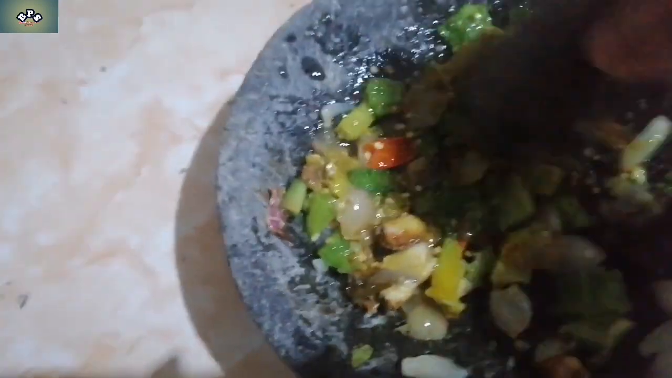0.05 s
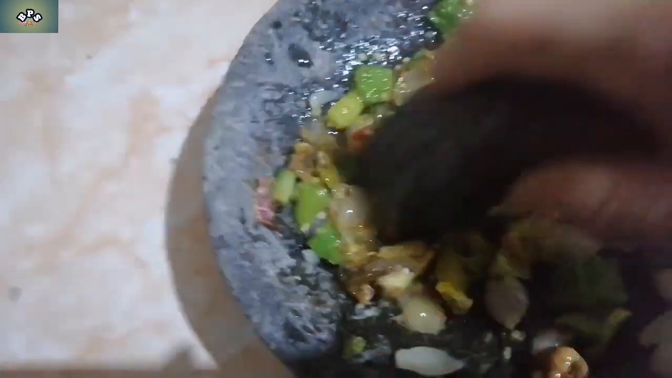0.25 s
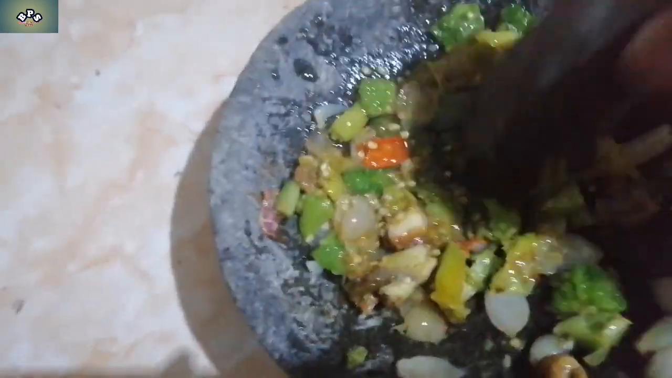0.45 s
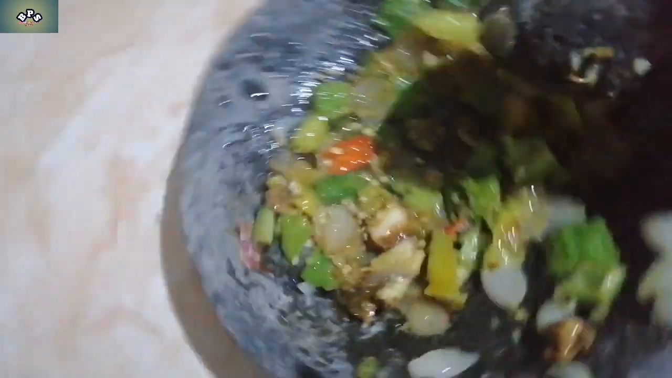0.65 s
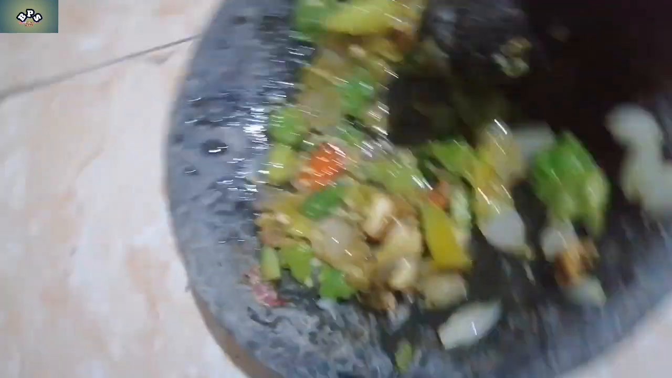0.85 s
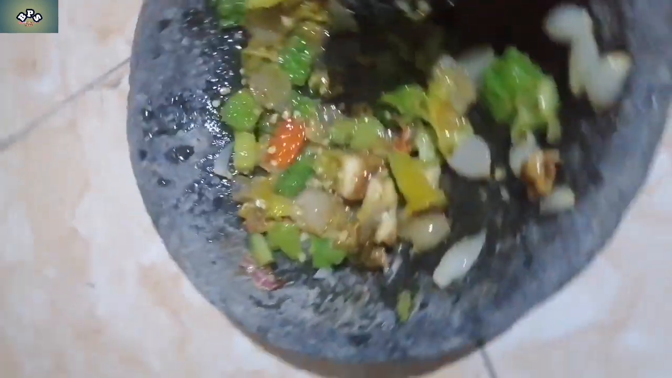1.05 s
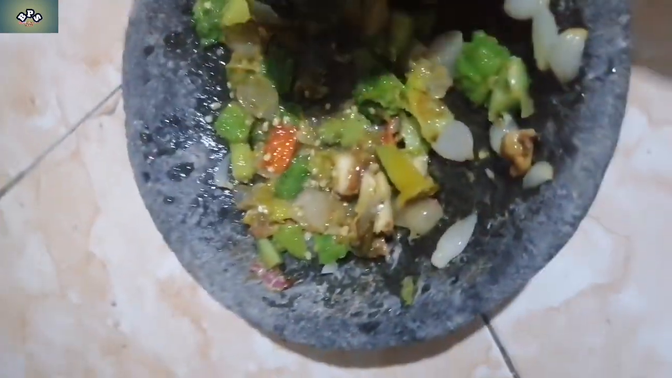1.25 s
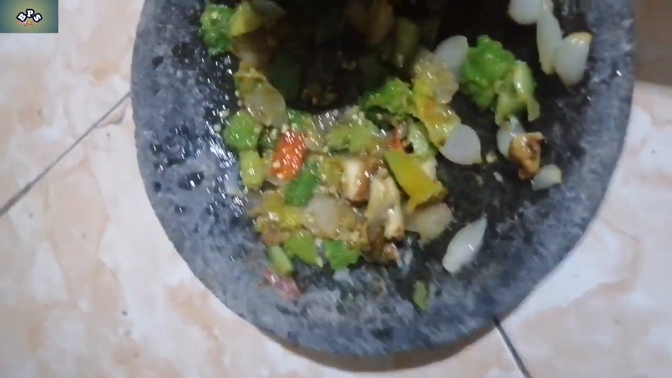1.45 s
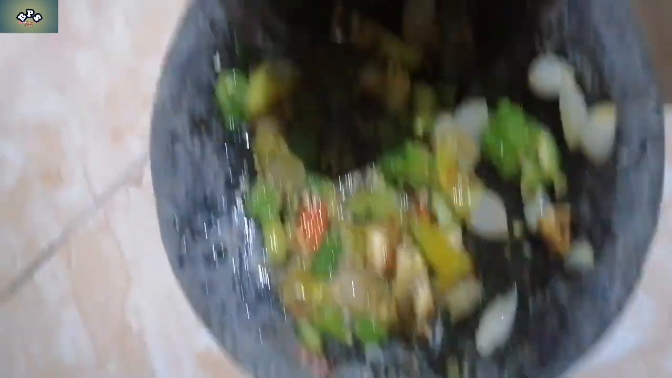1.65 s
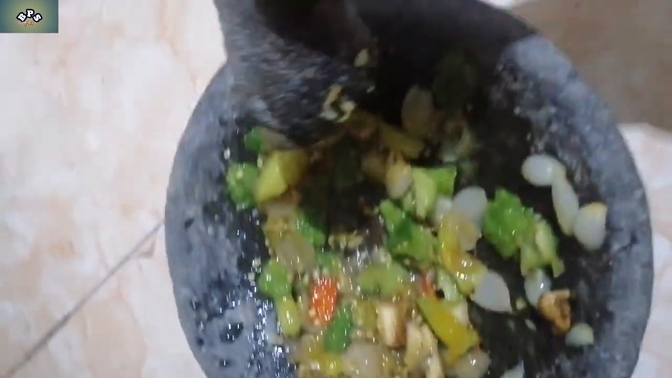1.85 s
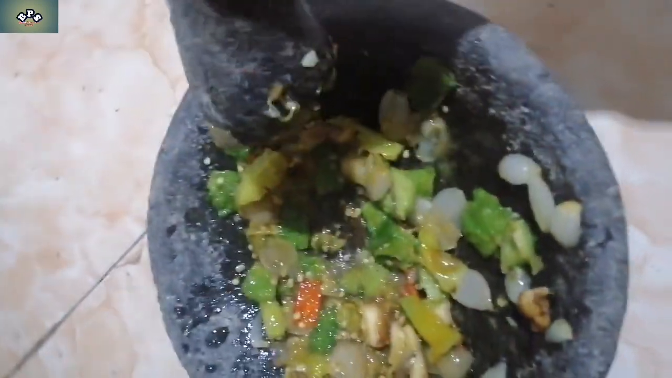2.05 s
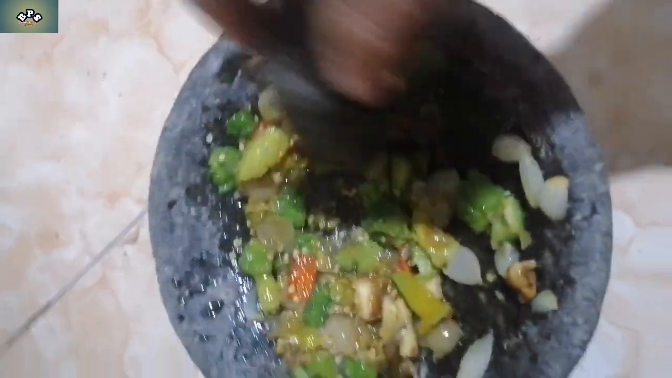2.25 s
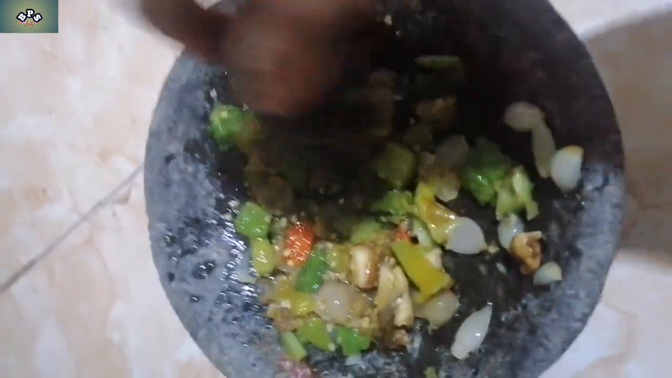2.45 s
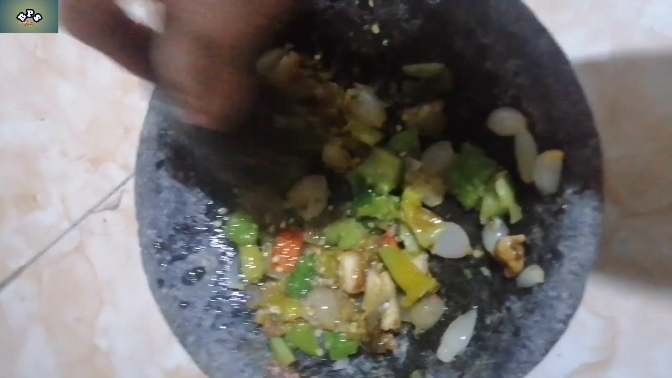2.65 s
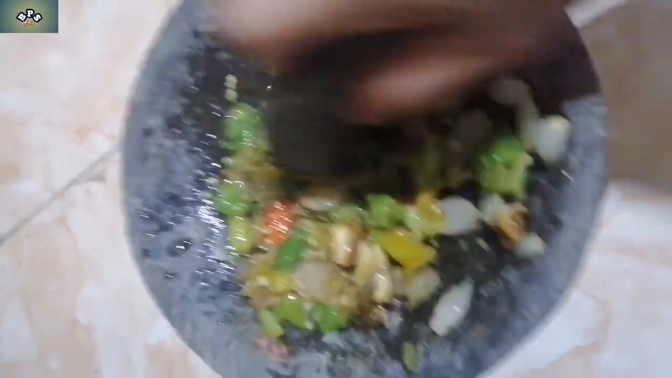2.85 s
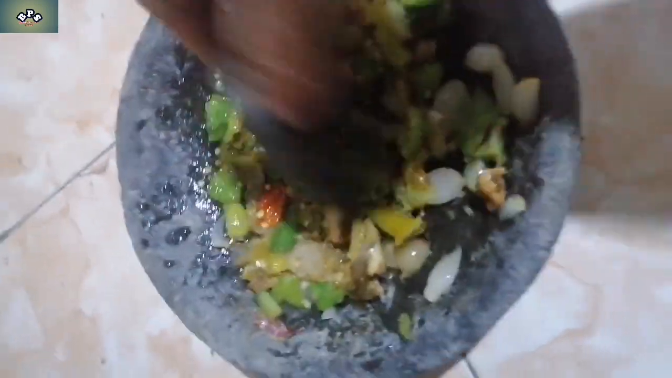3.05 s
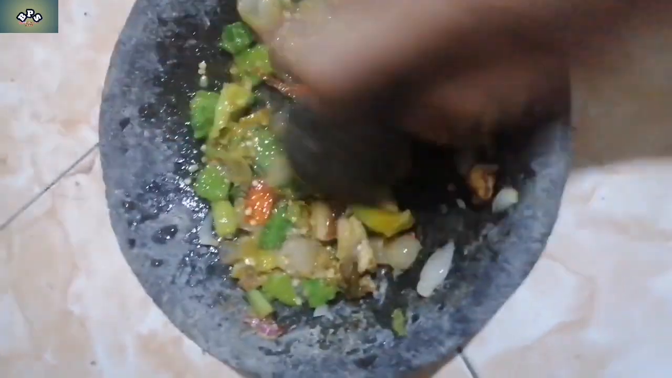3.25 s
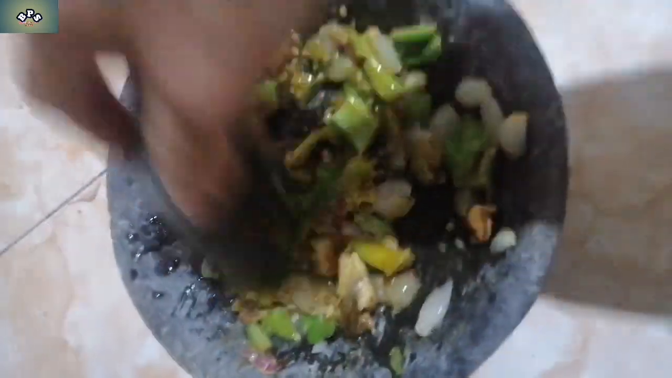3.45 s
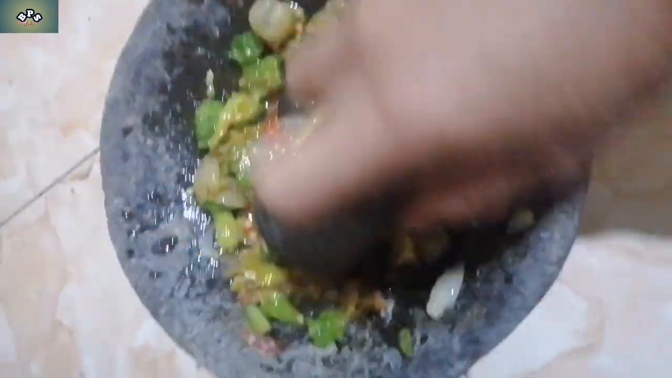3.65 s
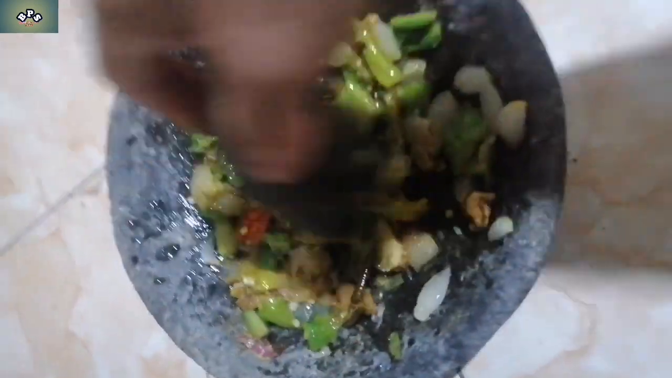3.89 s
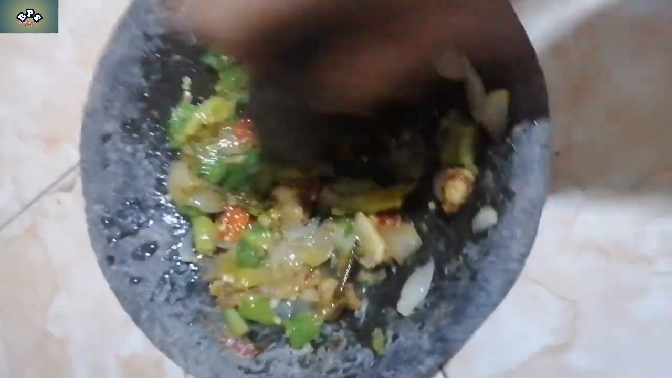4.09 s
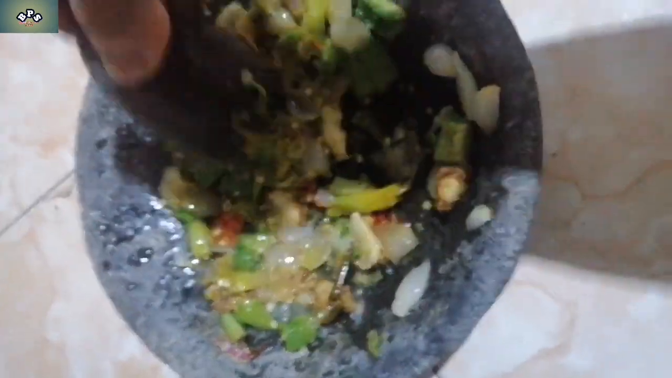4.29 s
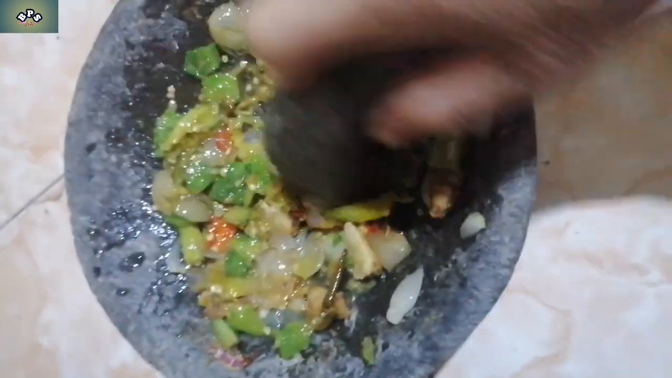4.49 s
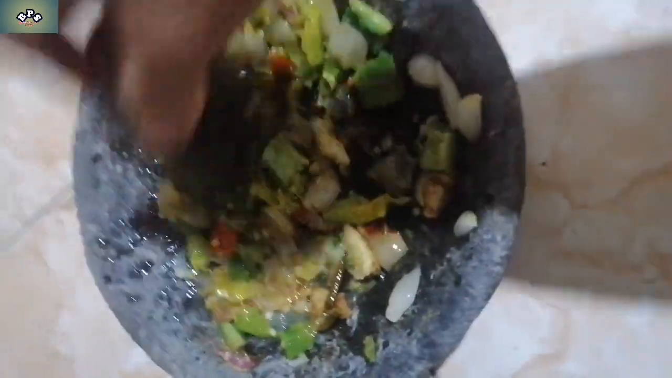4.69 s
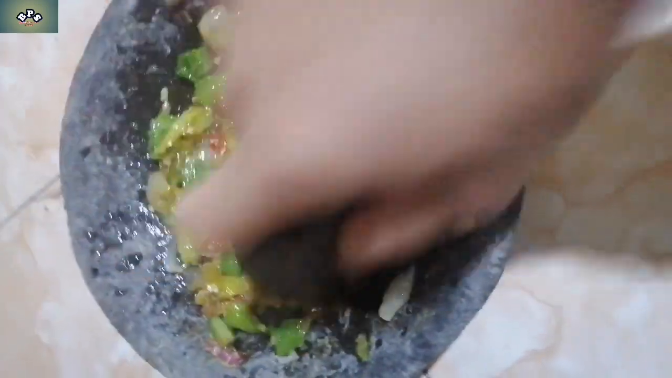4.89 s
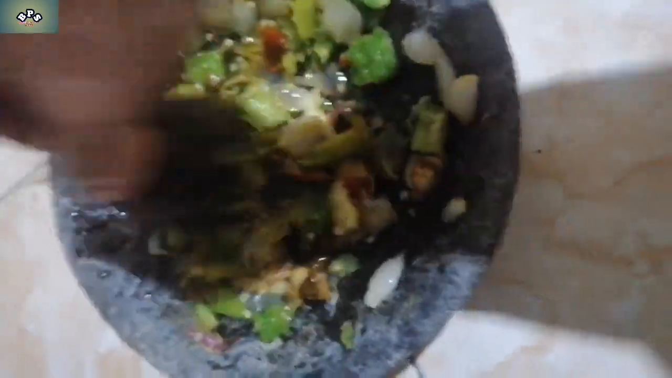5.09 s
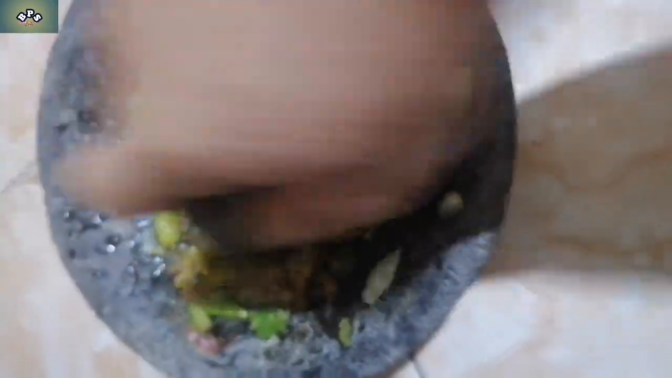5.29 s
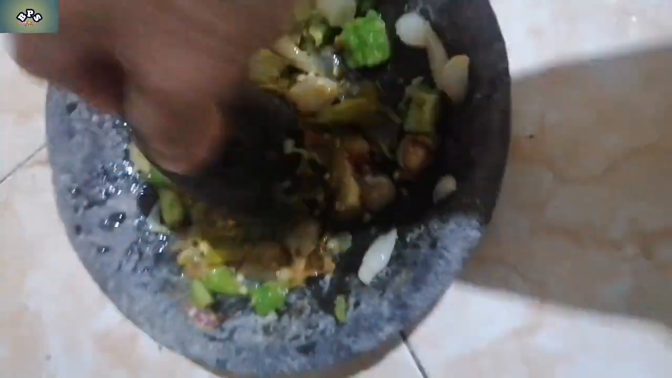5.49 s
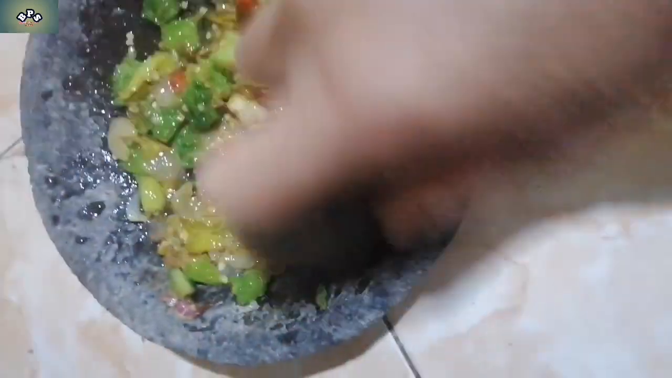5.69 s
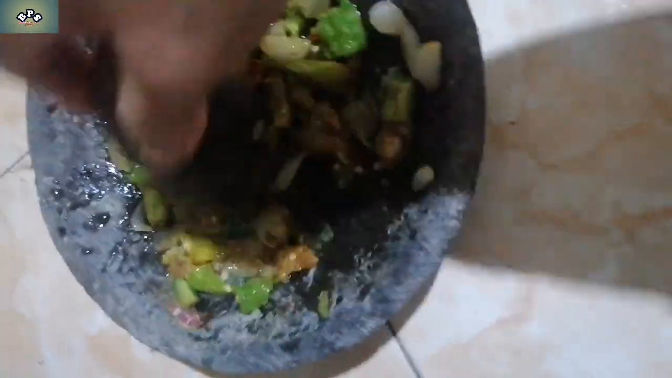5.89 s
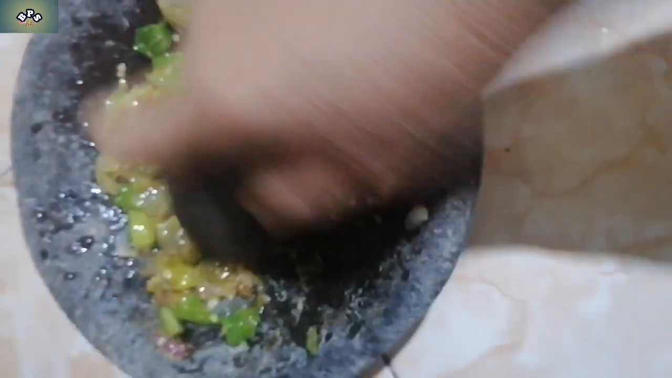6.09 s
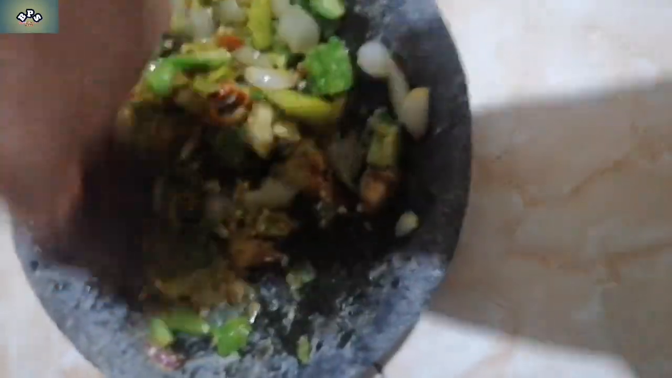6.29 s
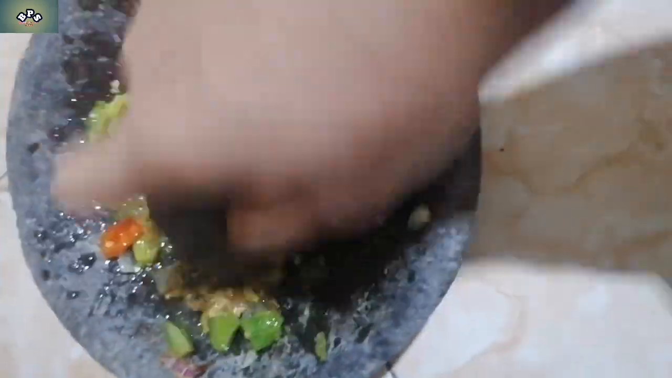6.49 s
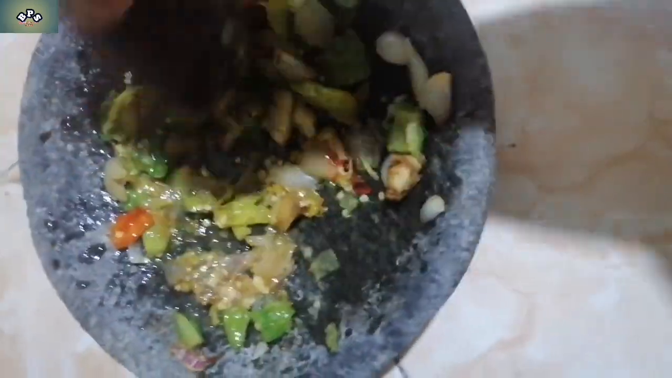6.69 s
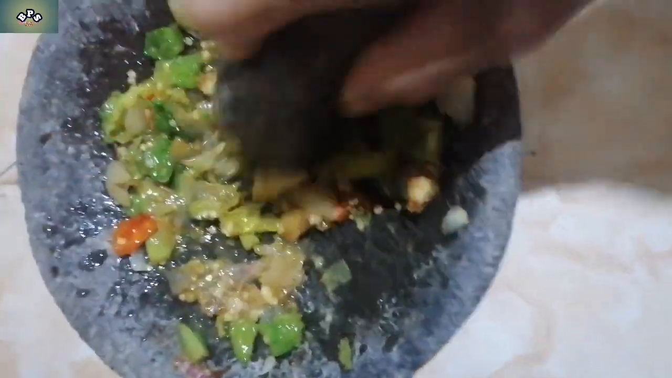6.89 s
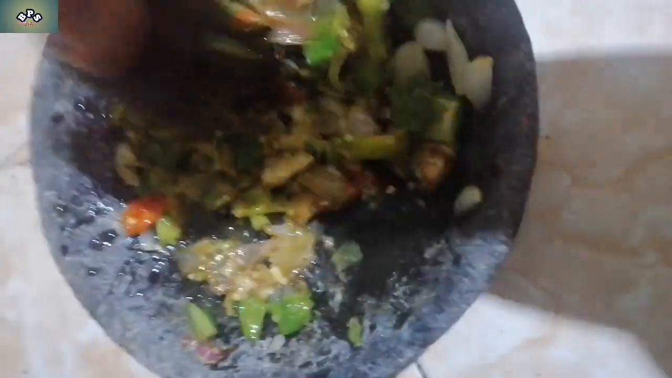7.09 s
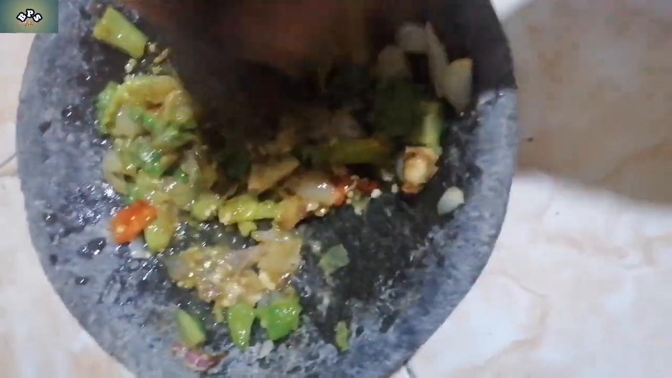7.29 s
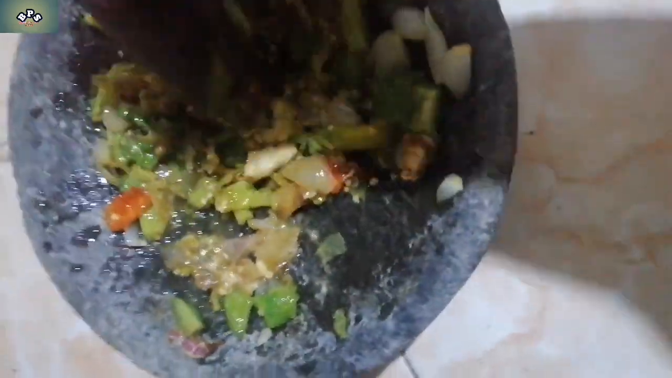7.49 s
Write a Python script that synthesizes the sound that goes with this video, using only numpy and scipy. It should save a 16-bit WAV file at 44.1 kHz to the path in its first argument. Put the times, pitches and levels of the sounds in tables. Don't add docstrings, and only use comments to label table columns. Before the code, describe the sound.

Dull, woody-sounding stone knocks thump the floor and faintly ring the bowl, each mixed with a bright wet fizz and crisp vegetable pops. After a couple of early hits there is a near-silent gap, then the pounding becomes busy and uneven, strongest past the middle, with one clear stone clink. Close stereo pickup, leaning somewhat left, in a reverberant kitchen with faint hum and hiss.

```python
import sys
import numpy as np
from scipy import signal
from scipy.fft import rfft, irfft, next_fast_len
from scipy.io import wavfile
from scipy.ndimage import uniform_filter1d

SR = 44100
rng = np.random.default_rng(int(sys.argv[2]) if len(sys.argv) > 2 else 0)


def ratio_of_db(decibels):
    return 10 ** (np.asarray(decibels, float) / 20)


def materialize(psi):
    bounded = np.clip(np.atleast_2d(psi).T, -1, 1)
    quanta = np.round(bounded * 32767).astype(np.int16)
    wavfile.write(sys.argv[1], SR, quanta)


N = 332514

# frequency in Hz, level in dB per Hz.
AIR_SPECTRUM = [(20, -10), (45, -11.5), (65, -15), (215, -12.5), (300, -23), (900, -27.5), (2300, -33),
                (4200, -43.5), (7000, -39), (9600, -33.5), (11000, -42), (12500, -51), (14800, -47.5),
                (16200, -64)]
# frequency in Hz, likeness from -1 to 1.
AIR_LIKENESS = [(60, 0.56), (180, 0.88), (550, 0.47), (1650, -0.6), (4970, 0.32), (15000, -0.25)]
# frequency in Hz, left over right in dB.
AIR_LEAN = [(60, 0.5), (180, 3.6), (550, 0.5), (1650, 1.1), (4970, 0.41), (15000, 5.3)]
# frequency in Hz, width in Hz, level in dB.
HUM_LINES = [(27.1, 5.8, -60), (39.6, 6, -63.5), (97, 6.4, -70), (159, 3.9, -68), (196.6, 20, -70.5),
             (233.3, 19, -70.5), (539.6, 8.6, -75.5), (745, 23, -76.5)]

# delay in ms, level in dB.
ECHOES = [(5.0, -11.5), (8.0, -18.5), (13.5, -13), (15.5, -24.5), (24.0, -41)]
# frequency in Hz, 60 dB decay in seconds.
KITCHEN_DECAY = [(120, 0.87), (330, 0.65), (870, 0.87), (2300, 0.7), (6000, 0.42), (14000, 0.1)]
# frequency in Hz, level in dB.
ROOM_SEND = [(120, -11.5), (250, 7), (600, -5), (1500, -7), (3200, -5.5), (7000, -11), (14000, -19.5)]
# frequency in Hz, width in Hz, level in dB, left over right in dB.
PORT_CAVITIES = [(3200, 555, 6.5, 4.5), (5250, 1460, 0.5, -2.5), (7000, 200, 4.5, -15.5),
                 (10400, 1900, -1, 2), (14800, 3700, -32, 4)]

# time in seconds, left over right of the paste in dB.
PESTLE_PLACE = [(0, -12.5), (.4, -8.5), (2.45, -12.5), (2.95, -7), (3.2, -5), (3.33, -12), (3.7, 1),
                (4.1, -3), (4.55, -3), (4.95, -9), (5.33, -4), (5.8, -7.5), (6.15, -3.5), (6.25, -9),
                (6.5, -5.5), (6.95, -11), (7.25, -3.5), (7.4, -14)]

# frequency in Hz, level in dB per Hz.
FIZZ_SPECTRUM = [(2060, -37), (3500, -18), (4130, -7), (5330, -4.5), (6010, -6.5), (6400, 2), (7040, -3.5),
                 (8150, -3.5), (8970, -10), (10600, -20), (11500, -18), (14800, -19), (16000, -29.5)]
# frequency in Hz, level in dB per Hz.
SQUELCH_SPECTRUM = [(1200, -21), (2000, 7.5), (2700, 5), (3200, 0), (3800, -1), (4600, -24.5)]
# peak time in seconds, level in dB, build-up in seconds,
# squelch against the fizz in dB.
SPURTS = [(0.001, -48.5, 0.0011, 12), (0.317, -45, 0.0012, -0.5), (2.397, -44, 0.00084, 7),
          (2.652, -48, 0.0081, -11), (2.954, -46, 0.042, -2.5), (3.341, -39, 0.022, -28),
          (3.723, -38.5, .04, -9.5), (4.165, -37, 0.053, -8), (4.217, -42.5, 0.043, -5),
          (4.437, -47.5, 0.015, 1), (4.935, -44.5, 0.00061, -3), (4.955, -63.5, 0.0093, -22),
          (5.312, -38, 0.011, -11.5), (5.716, -78, 0.0034, 40), (6.096, -48, 0.00076, -1),
          (6.459, -39.5, 0.014, -4), (6.812, -56, 0.014, -18), (6.866, -46, 0.014, -1),
          (7.371, -37.5, 0.0078, -9)]
# peak time in seconds, level in dB, build-up in seconds,
# fade in dB per second, squelch against the fizz in dB.
SQUEEZES = [(0.083, -60, 0.61, 400, -22), (.372, -45, 0.0067, 280, -0.5), (0.5, -54.5, 0.021, 211, -14),
            (2.412, -49, 0.014, 98, -12), (2.542, -70, 0.081, 241, 1), (2.923, -54.5, 0.35, 195, -6.5),
            (2.977, -51, 0.018, 190, -13), (3.208, -54.5, .001, 98, -10), (3.354, -45.5, 0.1, 192, -8),
            (3.616, -44, 0.0012, 267, -6), (3.75, -54, .03, 91, -9.5), (4.049, -46, .001, 162, -11),
            (4.24, -56, 0.022, 101, -24), (4.544, -45, .2, 124, -7), (4.983, -46.5, 0.0099, 177, -2.5),
            (5.328, -45, 0.0065, 80, -10.5), (5.456, -49, 0.0032, 138, -8), (5.833, -44, 0.19, 129, -9.5),
            (6.17, -35.5, 0.056, 380, -11), (6.235, -56.5, 0.045, 138, -9.5),
            (6.559, -46.5, 0.057, 120, -6.5), (6.917, -51, 0.059, 66, -11.5),
            (7.272, -46.5, 0.037, 162, -9.5), (7.4, -48.5, 0.017, 103, -8.5)]

# start in seconds, peak in dB, pitch in Hz,
# left over right in dB, length in ms.
SPLITS = [(0.055, -42, 5040, -20, 0.34), (2.397, -33.5, 5250, -37, 1.1), (2.794, -44, 6060, -7, 1.7),
          (3.252, -39, 3330, 0.5, 3.8), (3.337, -35.5, 7200, -15, 1.5), (3.6177, -27.5, 4700, 13, 1),
          (3.643, -40, 6860, -4, 1.5), (3.8375, -46.5, 2670, 8, 1.2), (4.121, -40.5, 5300, -1, 0.97),
          (4.4682, -37.5, 6700, -2, 3.1), (4.9355, -36, 2700, 4, 2.2), (5.4108, -54, 7260, -6, 1.5),
          (5.4306, -43.5, 6700, -8, 2.1), (6.0927, -40.5, 8000, -3, 4)]
# start in seconds, peak in dB, pitch in Hz, left over right in dB.
POPS = [(0.313, -41.5, 2180, -3), (0.3187, -36, 3750, -6), (0.3756, -34.5, 6950, -2),
        (2.4952, -41, 5130, -13), (2.9477, -25.5, 7450, 1), (3.212, -51, 3580, 11), (3.716, -32, 6660, 3),
        (4.049, -41.5, 6550, -8), (4.208, -38.5, 3880, 16), (4.4359, -28.5, 3620, 9.5),
        (4.5206, -32.5, 4600, 10), (4.5483, -32.5, 7070, -7), (4.9537, -38.5, 7300, -14),
        (5.3118, -19.5, 7100, -9), (5.463, -31, 6600, -10), (5.7898, -35, 6940, -7),
        (5.858, -37.5, 5100, -10), (6.4563, -31.5, 6000, 12.5), (6.558, -40, 6400, -4),
        (6.8676, -33, 5500, 8), (6.9294, -34, 6600, 0), (7.2691, -52, 6400, 2), (7.384, -25, 5440, -7.5)]
# start in seconds, peak in dB, pitch in Hz.
TICKS = [(0.502, -52, 6750), (0.543, -57, 6420), (0.9408, -58, 5200), (1.031, -54, 4980),
         (1.1394, -57, 8900), (2.517, -45, 6800), (2.546, -47, 5990), (2.679, -45.5, 5700),
         (2.8365, -46, 6600), (4.983, -41, 6840), (7.0855, -46.5, 7270), (7.2115, -46.5, 6680),
         (7.5055, -47.5, 7000)]

# start in seconds, peak in dB, floor thump and bowl ring against it in dB.
BLOWS = [(0.326, -14.5, -3.5, -20), (2.395, -32.5, 8, -14), (2.647, -10, -10, -8), (3.014, -15, -9, -17.5),
         (3.247, -34.5, 10, -12), (3.348, -11.5, -15.5, -17.5), (3.637, -23, 0.5, -21),
         (3.73, -11, -3, -16), (4.058, -22.5, 1, -13), (4.459, -22.5, -1, -18.5), (4.594, -9, -11, -16.5),
         (4.941, -14.5, -2.5, -15), (5.345, -26.5, -6, -12.5), (5.454, -12, -12, -15.5),
         (5.719, -4.5, -12.5, -11), (6.103, -21.5, 2, -11), (6.206, -13.5, -9.5, -17.5),
         (6.469, -24.5, -2, -10), (6.606, -19.5, -15, -22.5), (7.285, -25, -3, -22)]
MORE_KNOCKS = [(0.355, -19.5, -9, -13), (0.397, -10, -23, -15.5), (3.237, -32, -29, -11),
               (3.279, -27, -36, -10.5), (3.299, -37, -6, -18), (6.194, -25, -8, -19), (3.667, -28, -4, -16),
               (3.682, -31, 0, -36), (3.741, -17, -5.5, -14), (3.789, -20, -2.5, -16.5), (3.816, -27.5, 3.5, -25),
               (4.083, -19, -24, -19), (4.097, -13, -19, -15), (4.127, -16, -1, -10), (4.983, -18, -26, -16.5),
               (4.975, -22, -21.5, -16), (5.035, -14.5, -10.5, -16.5), (6.157, -23.5, -26, -14),
               (6.23, -23.5, -6, -26.5), (6.507, -21.5, -42, -18.5), (6.529, -30, -3, -11), (6.568, -27, 3, -12),
               (7.369, -56, 19, -20)]
# start in seconds, peak in dB.
CLINKS = [(2.394, -48), (2.647, -39.5), (3.014, -52), (3.246, -46), (3.277, -38), (3.729, -39),
          (4.057, -35.5), (4.593, -47), (4.986, -44), (5.717, -19.5), (6.103, -46), (6.468, -37.5)]
# frequency in Hz, level in dB, 60 dB decay in seconds.
THUMP_MODES = [(193.1, -6.5, 0.21), (213.9, 0, 0.081), (281.9, 1, 0.064), (348, 1, 0.021)]
PUSH_MODES = [(88.6, 0.0, 0.16)]
BODY_MODES = [(493, 0, 0.0086), (583.5, 5.5, 0.011), (704.3, 5, 0.016), (866, 1.5, 0.017)]
BOWL_MODES = [(920, 0.0, 0.043)]
RING_MODES = [(1532, -5, 0.026), (1710, -15, 0.028)]
CLINK_MODES = [(3092, -10, 0.019), (5000, -18.5, 0.0089), (6400, -38, .01)]


def evened(x):
    return x / np.sqrt(np.mean(x ** 2) + 1e-20)


def read(points, hz):
    f, value = np.transpose(points)
    return np.interp(np.log(hz + 1), np.log(f + 1), value)


def add(mix, s, sound):
    part = mix[:, max(round(s * SR), 0):][:, :sound.shape[1]]
    part += sound[:, :part.shape[1]]


def placed(x, pan_db):
    return np.array([x * ratio_of_db(pan_db / 2), x * ratio_of_db(-pan_db / 2)])


def colour(x, points):
    length = x.shape[-1]
    size = next_fast_len(length)
    gain = ratio_of_db(read(points, np.fft.rfftfreq(size, 1 / SR)))
    return irfft(rfft(x, size) * gain, size)[..., :length]


def resonate(x, hz, width):
    r = np.exp(-np.pi * width / SR)
    pole = r * np.exp(2j * np.pi * hz / SR)
    return 2 * signal.lfilter([1 - r], [1, -pole], x).real


def place(s):
    return np.interp(s, *np.transpose(PESTLE_PLACE))


def stone_pan(s):
    return 12 + 0.83 * place(s)


def hum():
    bins = 8000
    hz = np.fft.rfftfreq(N, 1 / SR)[:bins]
    lines = np.zeros(bins)
    for f, width, db in HUM_LINES:
        lines += ratio_of_db(db) / np.sqrt(width) / (1 + (2 * (hz - f) / width) ** 2)
    chance = rng.standard_normal((bins, 2)) @ [1, 1j]
    return irfft(lines * chance, N) * N / np.sqrt(np.pi * N / SR)


def air():
    frames, hz = N // 512 + 5, np.fft.rfftfreq(2048, 1 / SR)
    a, b, c, d, patches = rng.standard_normal((frames, 1025, 5)).T
    patches = evened(uniform_filter1d(uniform_filter1d(patches, 20, 0), 8, 1))
    same = np.clip(read(AIR_LIKENESS, hz), -1, 1)[:, None]
    left = a + 1j * b
    right = same * left + np.sqrt(1 - same ** 2) * (c + 1j * d)
    level = ratio_of_db(read(AIR_SPECTRUM, hz)[:, None] + 1.2 * patches)
    z = np.array([left, right]) * level * placed(1, read(AIR_LEAN, hz))[:, :, None]
    noise = signal.istft(z, nperseg=2048, noverlap=1536)[1][:, :N]
    return ratio_of_db(-57) * evened(noise) + hum()


def room_tail():
    taps = np.zeros((3, SR))
    at = np.arange(300, SR - 20, 20) + rng.integers(0, 20, (3, (SR - 301) // 20))
    np.put_along_axis(taps, at, rng.choice([-1., 1.], at.shape), 1)
    hz, t, z = signal.stft(taps[:2] + 0.75 * taps[2], SR, nperseg=256)
    t60 = read(KITCHEN_DECAY, hz)[:, None]
    tail = signal.istft(z * ratio_of_db(-60 * t / t60) / np.sqrt(t60), SR, nperseg=256)[1]
    tail[:, :300] = 0
    return tail / np.linalg.norm(tail[0])


def kitchen(x):
    out, source = np.zeros((2, N)), x.mean(0)
    for (ms, db), side in zip(ECHOES, rng.uniform(0.94, 1, len(ECHOES))):
        add(out, ms / 1000, ratio_of_db(db) * placed(source, 3 + 4 * side))
    sent = colour(source, ROOM_SEND)
    turn = np.arange(N) / SR * np.pi * 3.1
    for k in range(3):
        fed = sent * np.cos(turn + k * np.pi / 3) * np.sqrt(2 / 3)
        ringing_on = signal.fftconvolve(fed[None], room_tail(), axes=1)[:, :N]
        out += placed(0.88, 1.53)[:, None] * ringing_on
    return out


def crackle(per_s, spread_db, length):
    size = ratio_of_db(spread_db * np.minimum(rng.exponential(1, length), 4))
    pops = size * (rng.random(length) < per_s / SR)
    puff = 0.5 + signal.lfilter([1], [1, -.96], pops)
    both, left, right = rng.standard_normal((3, length))
    return puff * np.array([both + 4.65 * left, both + 1.65 * right])


def juice():
    out = np.zeros((2, N))
    build_up_db, gone_db, spurt_fade = 19.5, -76, 1103
    spurts = [(s, db, rise, spurt_fade, low) for s, db, rise, low in SPURTS]
    for s, peak_db, rise, fade, squelch_db in spurts + SQUEEZES:
        rise = max(rise, 0.004)
        t = np.arange(max(s - rise, 0), s + (peak_db - gone_db) / fade, 1 / SR)
        db = peak_db - np.where(t < s, build_up_db * (s - t) / rise, fade * (t - s))
        fizz = evened(colour(crackle(500, 4.4, SR // 2), FIZZ_SPECTRUM))
        squelch = evened(colour(crackle(380, 4.2, SR // 2), SQUELCH_SPECTRUM))
        wet = np.tile(fizz + ratio_of_db(squelch_db) * squelch, 5)[:, :len(t)]
        add(out, t[0], ratio_of_db(db - 5.5) * wet * placed(1, place(t)))
    return out


def snaps():
    out, t = np.zeros((2, N)), np.arange(900) / SR
    # balance, length in ms, level of the top in dB
    rows = [(*split, -23.5) for split in SPLITS]
    rows += [(*pop, 1.75, -61) for pop in POPS]
    rows += [(*tick, place(tick[0]), 1.13, -25) for tick in TICKS]
    noises = rng.standard_normal((len(rows), 3, 900))
    for (s, db, hz, pan_db, ms, top_db), (a, b, c) in zip(rows, noises):
        pitched = resonate(resonate(a, hz, 0.3 * hz), hz, 0.3 * hz)
        crack = resonate(np.diff(b, 2, prepend=[0, 0]), 5500, 4000)
        top = resonate(resonate(c, 13500, 3500), 13500, 3500)
        burst = evened(pitched) + 0.18 * evened(crack) + ratio_of_db(top_db + 15.5) * evened(top)
        u = t / (ms / 1000)
        burst = burst * u ** 2 * np.exp(-2 * u)
        add(out, s - .001, placed(ratio_of_db(db - 3.5) * burst / abs(burst).max(), pan_db))
    return out


def ringing(modes, detune, contact_ms):
    t = np.arange(4000) / SR
    rings = np.zeros(4000)
    for (hz, db, t60), d in zip(modes, detune):
        rings += ratio_of_db(db - 60 * t / t60) * np.sin(2 * np.pi * hz * d * t)
    struck = -rings * (1 - np.exp(-t / (contact_ms / 1000))) ** 2
    return struck / abs(struck).max()


def blows():
    dull, bright = np.zeros((2, 2, N))
    landings = BLOWS + MORE_KNOCKS
    for (s, db, thump_db, ring_db), luck in zip(landings, rng.standard_normal((len(landings), 4))):
        pan_db = stone_pan(s)
        thump = ringing(THUMP_MODES, 1 + 0.017 * luck, 2.75)
        push = ringing(PUSH_MODES, 1 + 0.08 * luck, 1.3)
        knock = ringing(BODY_MODES, 1 + 0.061 * luck, 0.97)
        knock = knock + ratio_of_db(-12) * ringing(BOWL_MODES, 1 + 0.002 * luck, 0.2)
        ring = ringing(RING_MODES, 1 + 0.0088 * luck, 0.3)
        early = s - 0.0016
        add(dull, early, ratio_of_db(db + thump_db - 6) * placed(thump, pan_db))
        add(bright, early, ratio_of_db(db + thump_db - 24.5) * placed(push, pan_db))
        add(dull, s + 0.00056, ratio_of_db(db + 1.5) * placed(knock, pan_db))
        add(bright, s + 0.001067, ratio_of_db(db + ring_db) * placed(ring, pan_db - 10))
    for (s, db), luck in zip(CLINKS, rng.standard_normal((len(CLINKS), 3))):
        clink = ringing(CLINK_MODES, 1 + 0.0048 * luck, 0.27)
        add(bright, s + 0.000995, ratio_of_db(db) * placed(clink, stone_pan(s) - 10.5))
    band = signal.butter(4, [150, 1150], "band", fs=SR, output="sos")
    return signal.sosfilt(band, dull) + bright


def through_ports(crush):
    out = ratio_of_db(-2) * crush
    for hz, width, db, pan_db in PORT_CAVITIES:
        out = out + ratio_of_db(db) * resonate(crush, hz, width) * placed(1.0, pan_db)[:, None]
    return out


def scene():
    crush = through_ports(snaps() + juice())
    near = blows() + crush
    direct = np.array([near[0], np.roll(near[1], 6)])
    return direct + kitchen(near) + air()


def low_pass(x):
    return signal.sosfilt(signal.butter(12, 16500, fs=SR, output="sos"), x)


def record(dry):
    power_db = 10 * np.log10(abs(uniform_filter1d((dry ** 2).mean(0), 800)) + 1e-12)
    fall = np.arange(N) * 7.4 / SR
    held_db = np.maximum.accumulate(power_db + fall) - fall
    over_db = np.maximum(held_db + 42, 0)
    ducked = dry / ratio_of_db(0.11 * uniform_filter1d(over_db, 400))
    ducked = ducked - 0.3 * resonate(ducked, 3980, 435)
    edge = signal.firwin(255, 15900, window=("kaiser", 8), fs=SR)
    finished = signal.oaconvolve(ducked, edge[None], "same")
    return low_pass(finished)


dry = scene()
out = record(dry)
materialize(out)
```